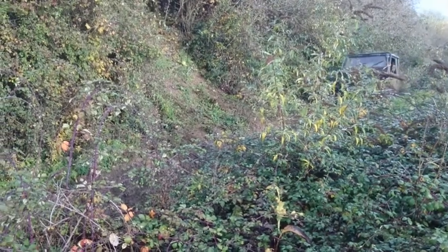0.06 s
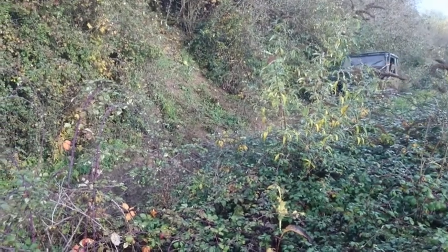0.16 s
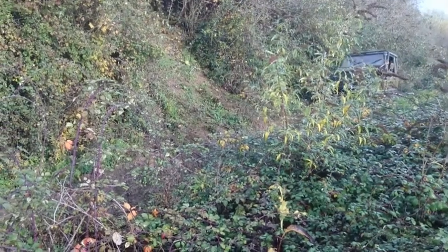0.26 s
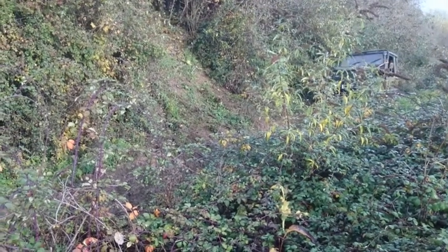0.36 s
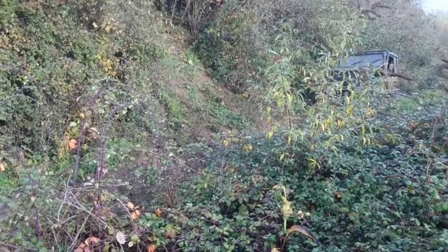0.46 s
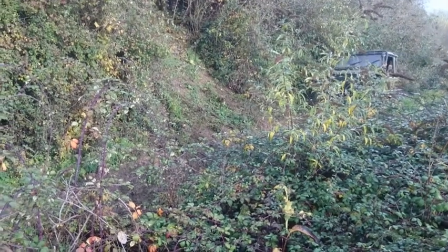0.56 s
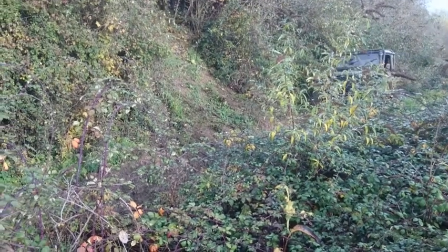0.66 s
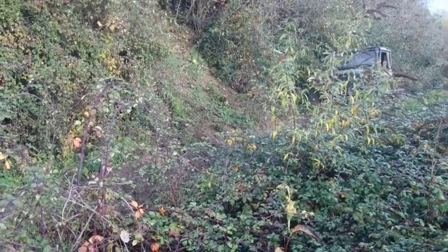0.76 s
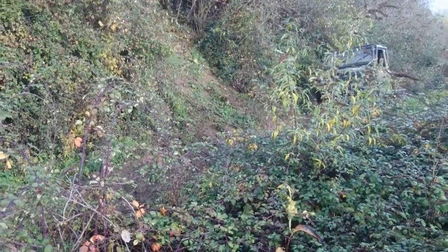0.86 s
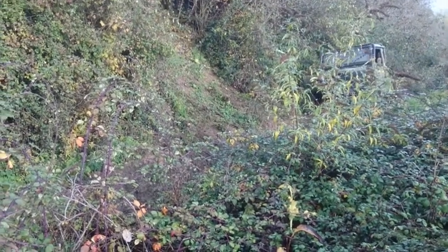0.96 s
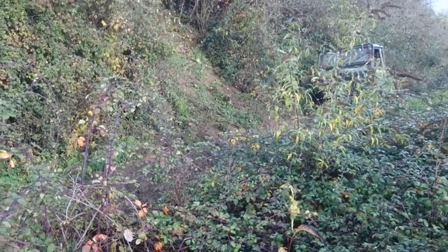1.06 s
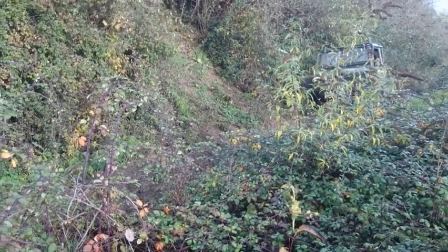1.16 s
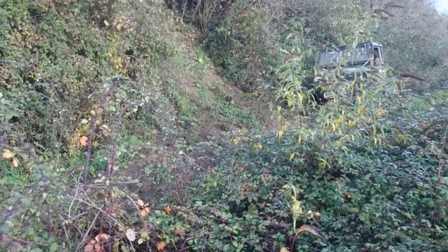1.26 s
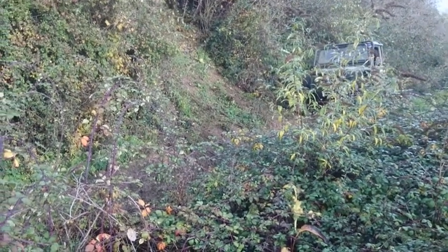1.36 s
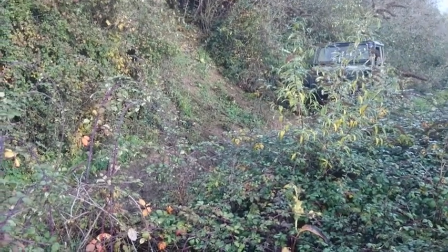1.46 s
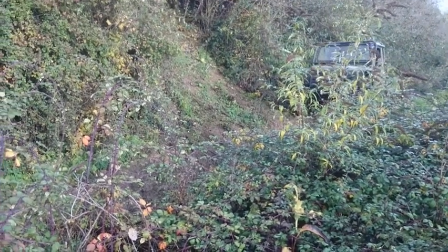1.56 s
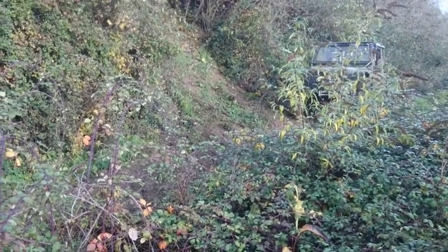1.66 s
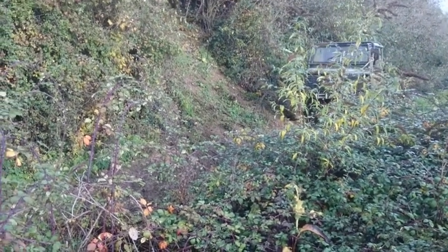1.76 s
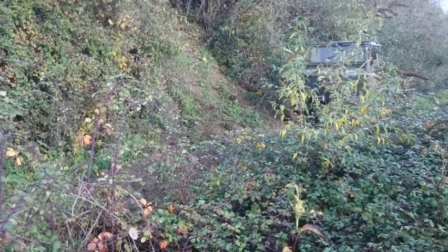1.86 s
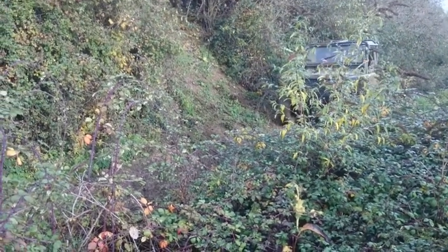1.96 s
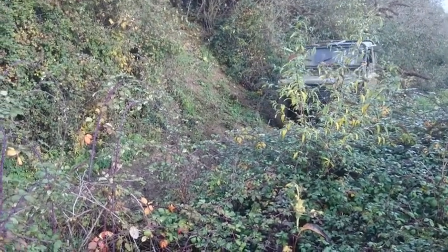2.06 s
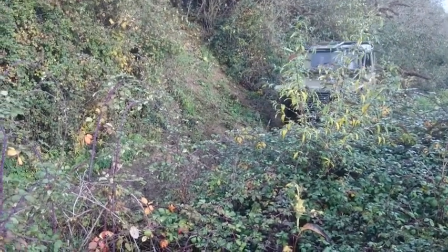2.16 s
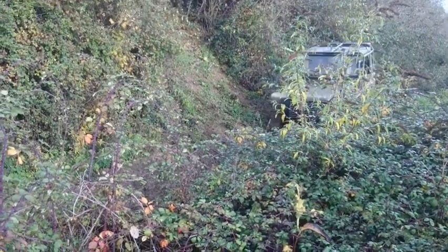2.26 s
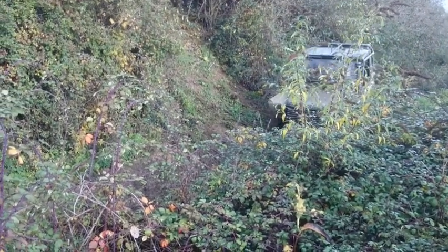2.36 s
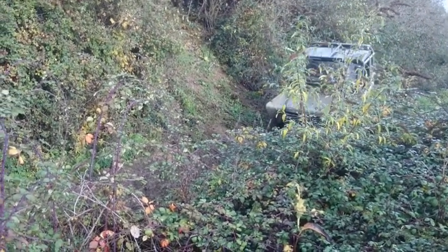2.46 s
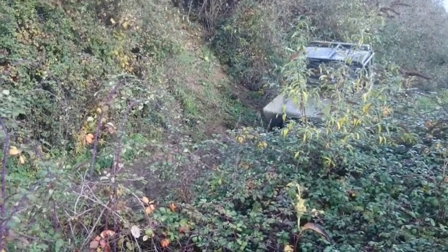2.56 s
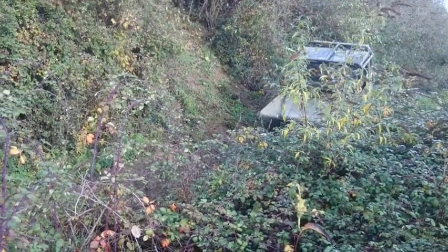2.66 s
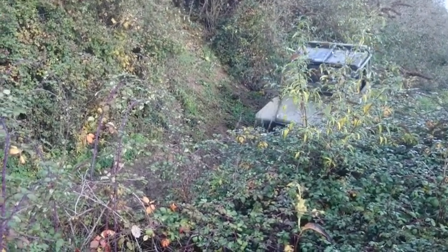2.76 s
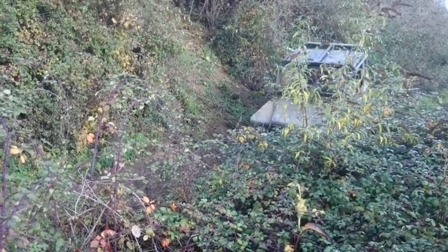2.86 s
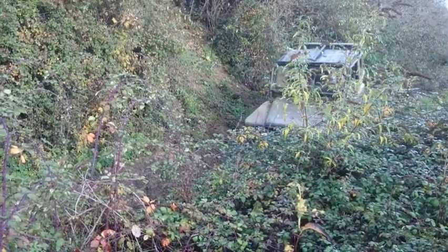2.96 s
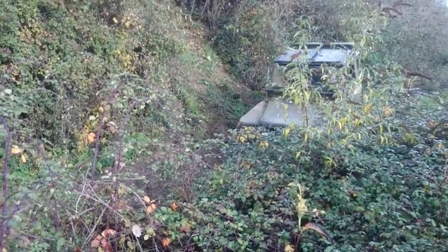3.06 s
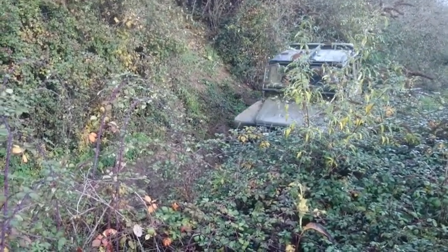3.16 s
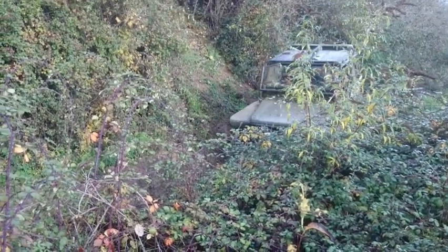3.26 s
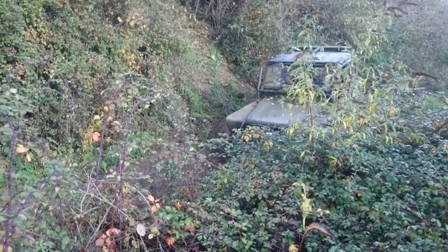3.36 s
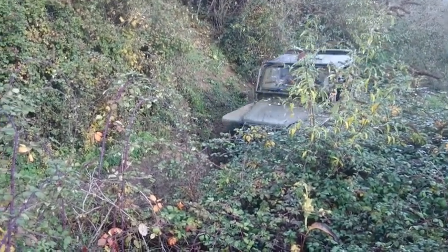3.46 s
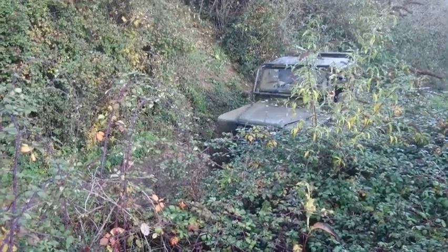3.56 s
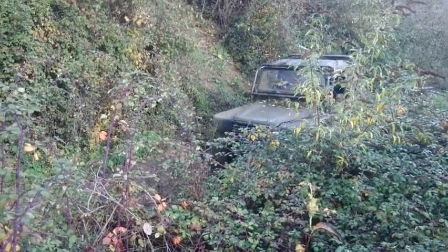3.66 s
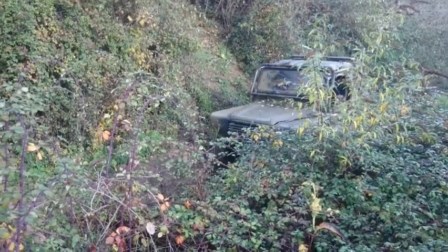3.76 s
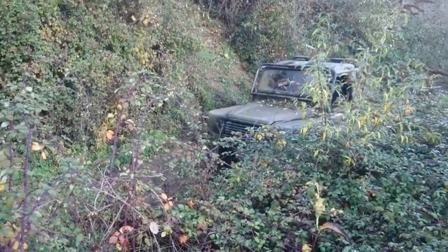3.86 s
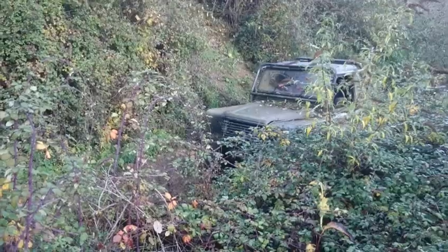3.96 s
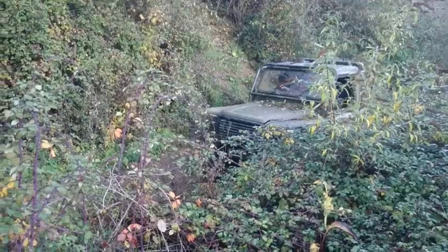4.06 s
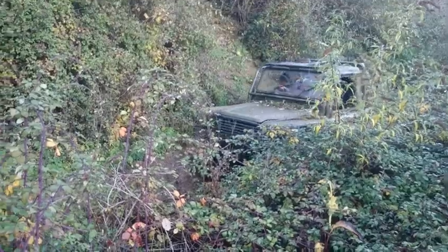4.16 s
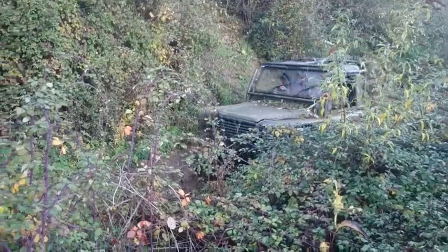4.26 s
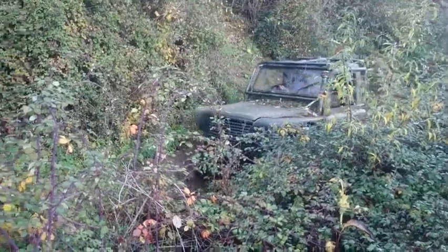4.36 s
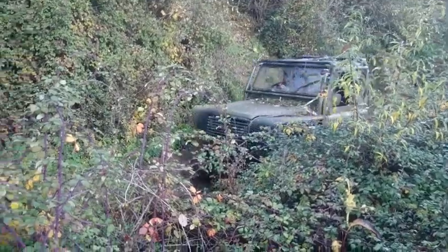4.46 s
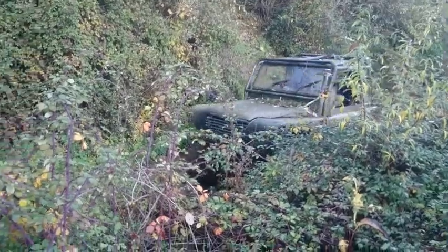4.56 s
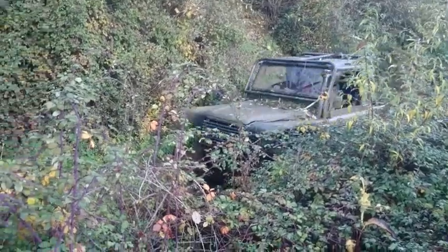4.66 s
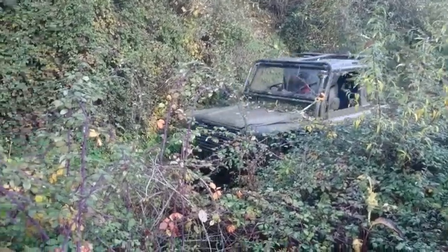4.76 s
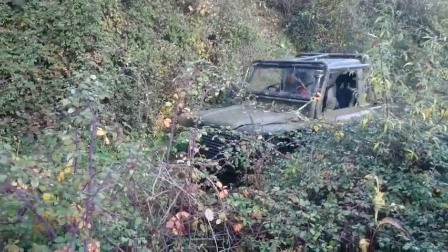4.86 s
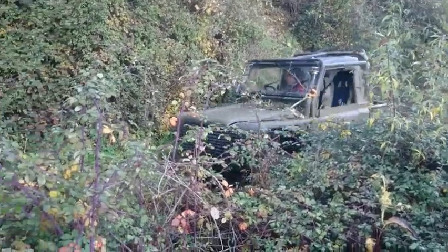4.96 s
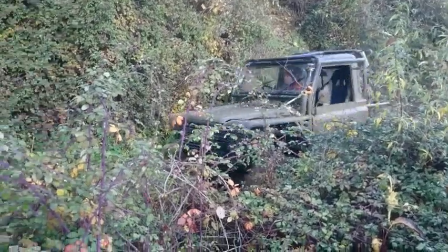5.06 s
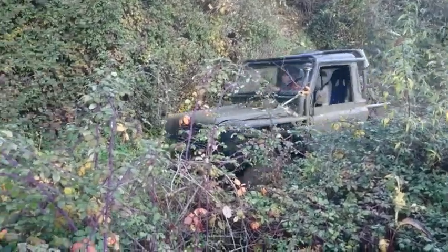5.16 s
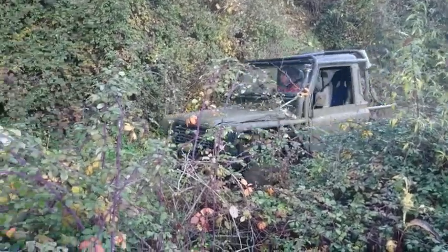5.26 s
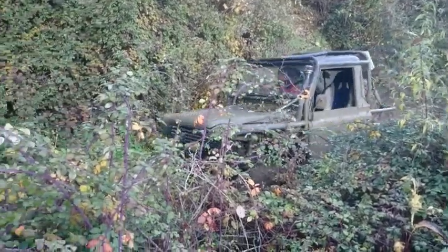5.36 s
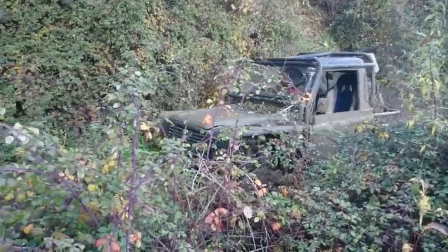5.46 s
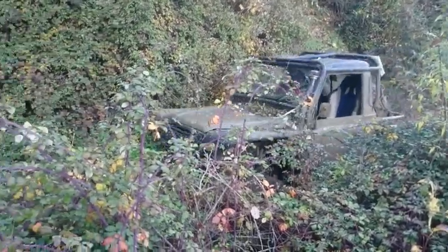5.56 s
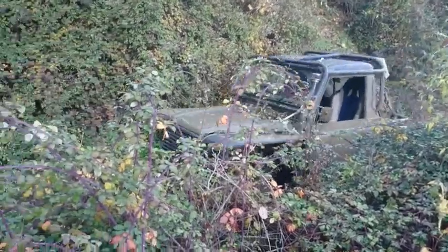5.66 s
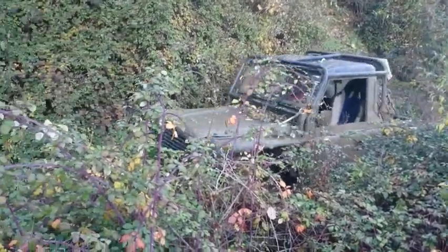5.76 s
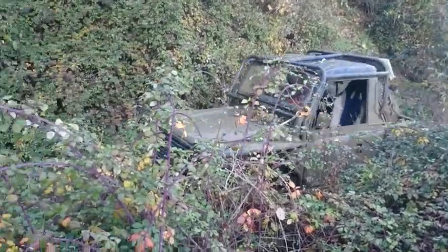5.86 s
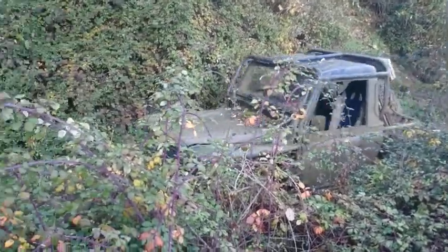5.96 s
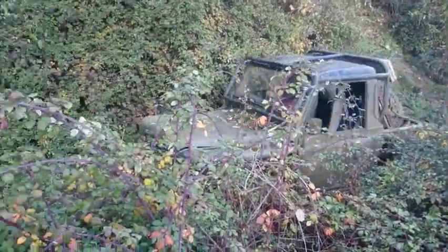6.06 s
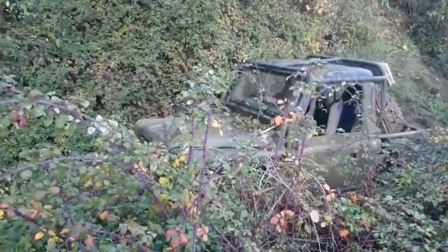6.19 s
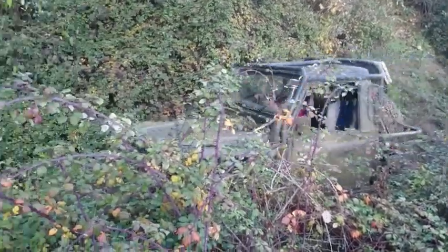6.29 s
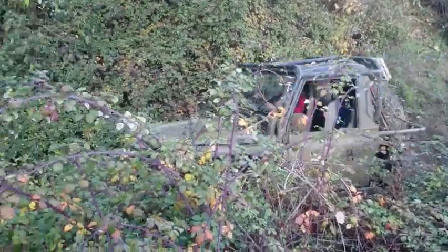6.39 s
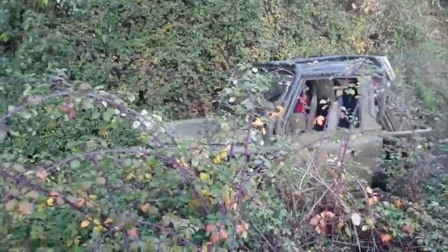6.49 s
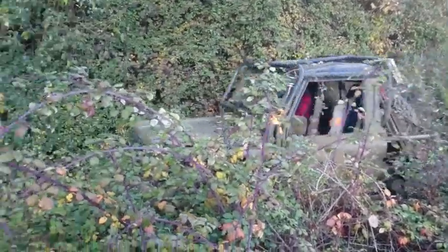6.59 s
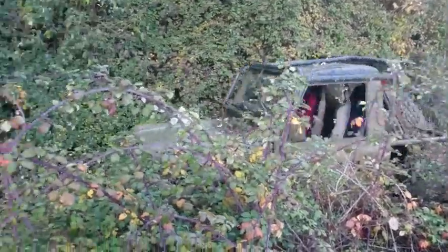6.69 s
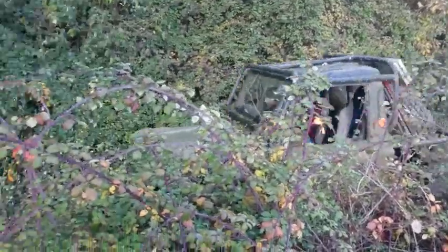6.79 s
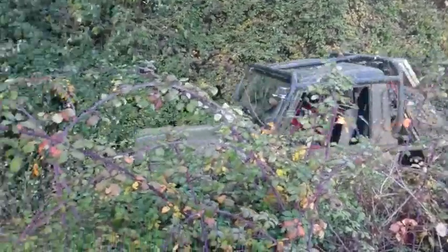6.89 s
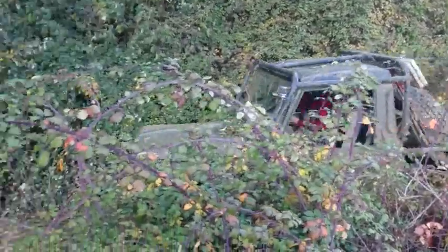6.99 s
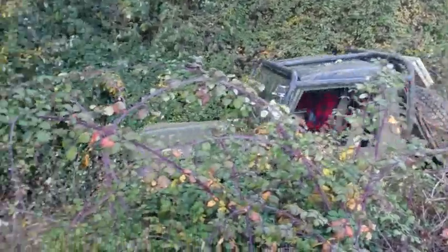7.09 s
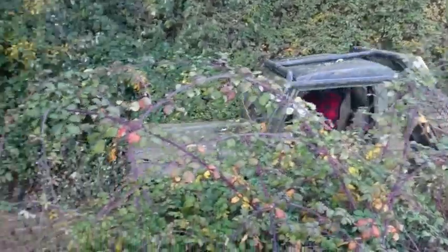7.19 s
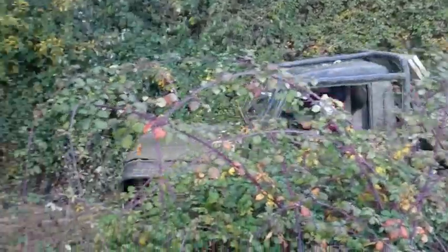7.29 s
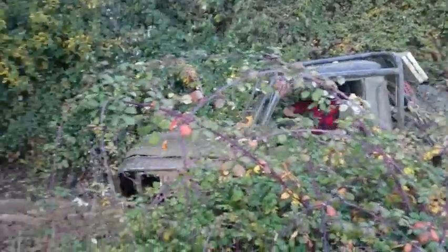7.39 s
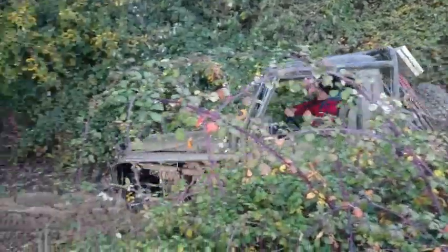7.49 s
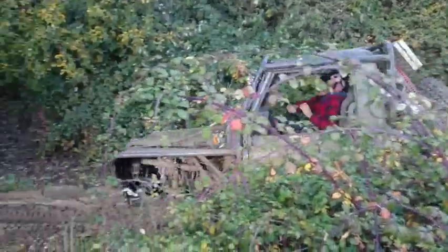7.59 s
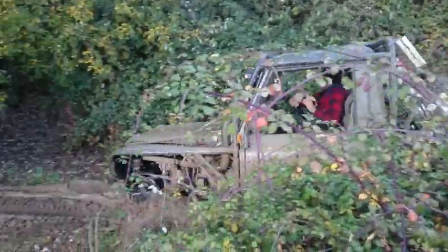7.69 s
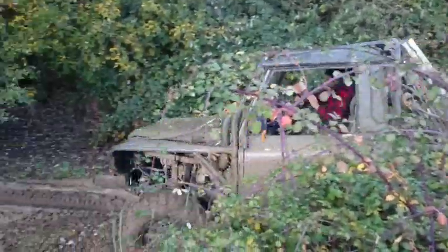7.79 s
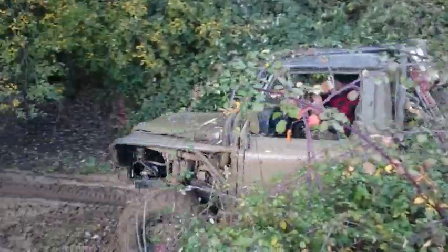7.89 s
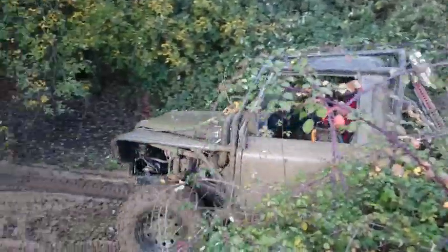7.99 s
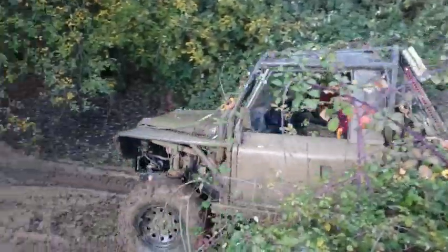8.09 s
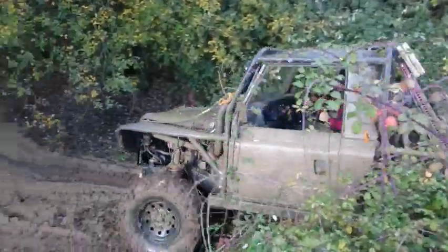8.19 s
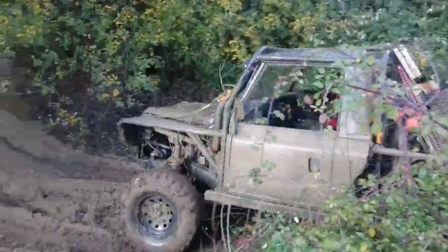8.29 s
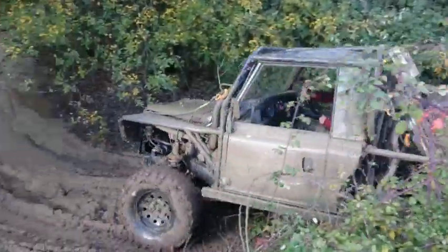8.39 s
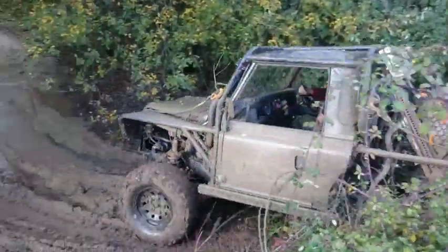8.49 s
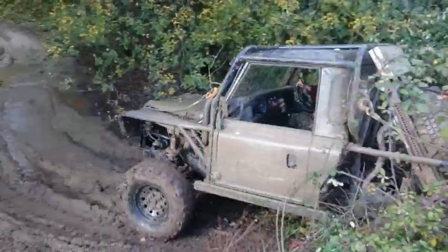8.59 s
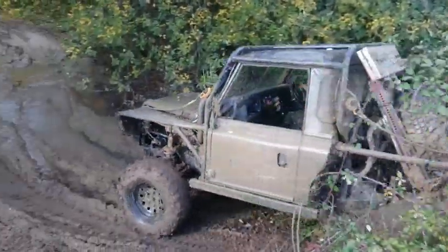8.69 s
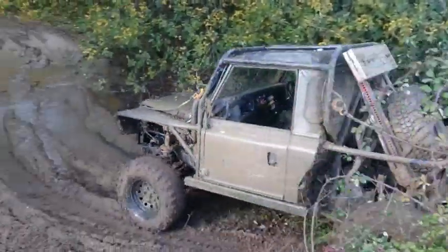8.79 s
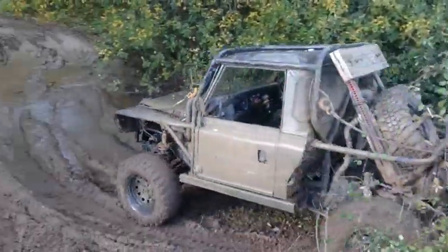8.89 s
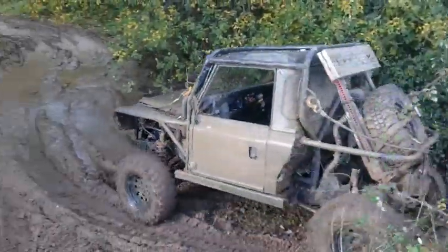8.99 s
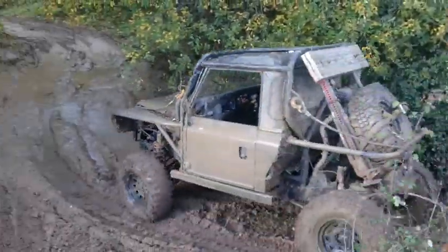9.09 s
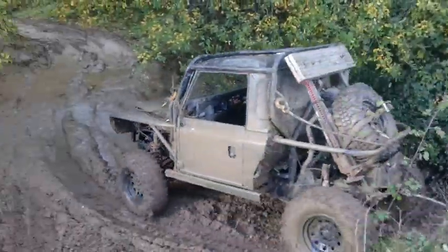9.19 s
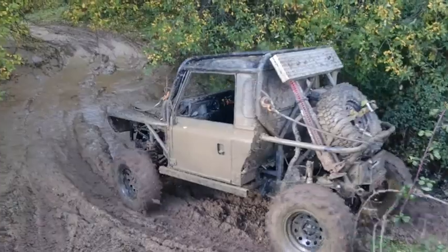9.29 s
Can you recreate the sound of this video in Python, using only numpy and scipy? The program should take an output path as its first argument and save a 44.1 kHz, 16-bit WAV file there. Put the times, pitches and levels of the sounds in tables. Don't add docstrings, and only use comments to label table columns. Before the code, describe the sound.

Muffled, distant diesel throb with faint leaf hiss grows into a close, rattling engine clatter. The revs sag after two seconds, lug slowly, then climb towards the end. Brief bright squeaks pierce it, strongest around six and a half seconds. Wood snaps scatter through the middle, followed by a loud crack and hollow panel knocks at eight. Open air, slight slope echo, small camera microphone nearby as the truck comes past.

```python
import sys
import numpy as np
from scipy import signal
from scipy.fft import rfft, irfft, next_fast_len
from scipy.io import wavfile
from scipy.ndimage import uniform_filter1d

SR = 44100
rng = np.random.default_rng(int(sys.argv[2]) if len(sys.argv) > 2 else 0)


def gain_from_db(level_db):
    decades = np.asarray(level_db, float) / 20
    return 10 ** decades


def wav_record(signal):
    frames = np.transpose(np.atleast_2d(signal))
    bounded = np.clip(frames, -1, 1)
    quanta = np.round(bounded * 32767).astype(np.int16)
    wavfile.write(sys.argv[1], SR, quanta)


N = 411894
T = np.arange(N) / SR
FAST = next_fast_len(N)
HZ = np.maximum(np.fft.rfftfreq(FAST, 1 / SR), 1)
LEVEL_REF_DB = -42


def unit(x):
    return x / np.sqrt(np.mean(x ** 2))


def on_log(table, column=1):
    columns = np.array(table)
    return np.interp(np.log(HZ), np.log(columns[:, 0]), columns[:, column])


def colour(x, table):
    return unit(irfft(rfft(x, FAST) * gain_from_db(on_log(table)), FAST)[..., :N])


def ring(x, hz, width_hz):
    return signal.lfilter(*signal.iirpeak(hz, hz / width_hz, fs=SR), x)


def curves(table):
    s, *columns = np.transpose(table)
    return [np.interp(T, s, column) for column in columns]


def walk(rate, count=1):
    hold = int(SR / rate)
    steps = np.repeat(rng.standard_normal((count, N // hold + 1)), hold, axis=1)
    return 1.356 * uniform_filter1d(uniform_filter1d(steps, hold), hold)[:, :N]


def noise():
    return rng.standard_normal((2, N))


def gate(start, end, fade_s):
    edge_s = np.minimum(T - start, end + 0.019 - T)
    return np.sin(np.pi / 2 * np.clip(edge_s / fade_s, 0, 1)) ** 2


# (time [s], exhaust level [dB], block level [dB], knock depth
EFFORT = [(0, -45.5, -43.5, 0.07), (.99, -45, -39.5, 0.28), (1.5, -40, -40, 0.04), (1.85, -54, -43, 0.27),
          (2.15, -62, -44, 0.13), (2.5, -57, -41, 0.32), (2.92, -64, -44.5, 0.24), (3.25, -54, -43, 0.19),
          (4.05, -47.5, -37.5, 0.33), (4.7, -44, -39, 0.2), (5.3, -39, -35, 0.32), (5.9, -38, -38, 0.23),
          (6.3, -37, -35, 0.1), (6.8, -34.5, -31, 0), (7.57, -39, -29, 0.45), (8.43, -35, -29.5, 0.13),
          (9.0, -35.5, -29, 0.21), (9.34, -33, -25, 0.28)]


def effort():
    return curves(EFFORT)


# (time [s], firing rate [1/s])
FIRING_RATE = [(0, 48), (.6, 52.3), (.8, 46), (1.14, 50.9), (1.62, 44.3), (2.15, 32.8), (2.55, 38),
               (2.98, 34.2), (4.1, 37.8), (4.76, 32.7), (5.2, 37.2), (5.62, 32), (6.16, 34), (6.45, 40),
               (6.65, 38.3), (7.3, 44.3), (8.9, 48.2), (9.34, 53.3)]


def speed():
    return uniform_filter1d(curves(FIRING_RATE)[0], size=6000, mode="nearest")


# (time [s], delay [ms], share [0-1])
MUD_BOUNCE = [(0, 3.4, 0), (2, 2.55, 0), (4, 1.91, 0.18), (5.5, 2.13, 0.06), (6.5, 1.65, 0.27),
              (7.5, 1.43, 0.33), (8.3, 1.42, 0), (9.34, 2.17, 0.23)]


def over_ground(x):
    later_ms, share = curves(MUD_BOUNCE)
    bounce = np.array([np.interp(T - later_ms / 1000, T, path) for path in x])
    return x + share * bounce


# (time [s], level [dB])
BRUSH_RUB = [(0.0, -55), (0.49, -51), (0.72, -56), (1.43, -54.5), (1.95, -59.5), (2.39, -57), (2.57, -50.5),
             (2.78, -59.5), (3.09, -61.5), (3.82, -55.5), (4.84, -51.5), (5.02, -47.5), (6.01, -51),
             (7.08, -45.5), (7.52, -45), (7.91, -41.5), (8.79, -41), (9.34, -37)]
# (frequency [Hz], level [dB per Hz])
LEAF_COLOUR = [(1760, -48.5), (3000, -4), (4000, -9.5), (4350, -7.5), (5070, -9), (6480, -6.5),
               (11200, -12.5), (14700, -21), (16000, -20)]
# (start [s], end [s], level [dB], fade [s])
CANE_SCRAPE = (1, 3.5, -55, 2.3)


def leaves():
    hiss_db = curves(BRUSH_RUB)[0]
    ticks = (rng.random(N) < 120 / SR) * gain_from_db(3.0 * rng.exponential(size=N))
    hiss = noise() * (1 + 0.26 * signal.lfilter([1], [1, -0.98], ticks))

    whistle = unit(ring(ring(noise(), 8510, 850), 8420, 1000))
    block_db = effort()[1]
    whistle_db = -23 + LEVEL_REF_DB + 0.45 * (block_db - LEVEL_REF_DB) - hiss_db
    whistle_db = whistle_db + 6 * gate(-1, 1.9, 0.88)

    start, end, scrape_db, fade_s = CANE_SCRAPE
    cane = unit(ring(ring(noise(), 4300, 500), 4000, 500))
    scrape = gain_from_db(scrape_db) * gate(start, end, fade_s) * cane
    rub = gain_from_db(hiss_db + 2.0 + 1.3 * walk(9.2))
    return scrape + rub * (colour(hiss, LEAF_COLOUR) + gain_from_db(whistle_db) * whistle)


# (time [s], tick level [dB], branch level [dB], thump level [dB], decay t60 [s])
BREAKS = [(1.9987, -17.5, -74.5, -60, 0.016), (3.397, -21.5, -26, -51.5, 0.032),
          (3.099, -56, -37, -60.5, 0.0288), (3.902, -54.5, -28.5, -31.5, 0.017),
          (3.975, -47, -42, -45, 0.039), (4.359, -54, -26.5, -51.5, 0.035), (5.491, -20, -10.5, -26, 0.062),
          (6.610, -33.5, -40.5, -50.5, 0.017), (7.298, -38, -40, -50, 0.036), (7.381, -50, -29, -44, 0.04),
          (7.954, -28, -19.5, -41, 0.094), (7.963, -31, -14, -18, 0.2), (9.333, -14.5, -19, -39, 0.048)]
# (frequency [Hz], level [dB per Hz])
TWIG_COLOUR = [(2500, -22), (4200, -20), (5500, -16), (7700, -3), (10000, -9.5), (13000, -30),
               (16000, -25.5)]
# (frequency [Hz], level [dB per Hz])
BRANCH_COLOUR = [(470, -75), (800, 1), (1190, -1.5), (1540, 1), (1910, 2.5), (3060, -6), (3920, -9.5),
                 (4410, -18), (7000, -22.5), (9100, -51), (15400, -120)]
# (frequency [Hz], width [Hz], level [dB])
WOOD_RING = [(550, 240, -3), (1100, 70, -14.5), (1817.5, 105, -0.5), (2300, 140, -11), (3060, 270, -10.5)]
# (time [s], level [dB], frequency [Hz], decay t60 [s])
PANEL_THUDS = [(2.29, -32, 940, 0.04), (2.315, -33, 760, 0.05), (5.497, -23.5, 243, 0.244),
               (5.51, -21, 186, 0.25), (5.53, -24, 113, 0.3), (5.50, -20.5, 464, 0.27),
               (7.974, -24, 180, 0.174), (7.994, -0.5, 330.3, 0.031), (8.047, -2.5, 271, 0.057),
               (8.068, -11, 250, 0.07), (8.087, -32, 198.9, 0.071)]


def cracks():
    bursts = np.zeros((3, N))
    for s, *layer_db, t60 in BREAKS:
        tail_db = -2.5 + 0.59 * layer_db[1]
        a = int(s * SR)
        t = T[:min(SR // 2, N - a)]
        decay = gain_from_db(-60 * t / t60) + gain_from_db(tail_db - 60 * t / 0.37)
        level = gain_from_db(np.array(layer_db) - 3.5)[:, None]
        bursts[:, a:a + len(t)] += np.minimum(t / 0.0032, 1) * decay * level
    tick, branch, bump = bursts

    splinter = gain_from_db(2.0 * walk(250)[0])
    snap = splinter * (tick * colour(noise(), TWIG_COLOUR) + branch * colour(noise(), BRANCH_COLOUR))
    shake = branch * noise()
    for hz, width_hz, db in WOOD_RING:
        even_out = np.sqrt(SR / (np.pi * width_hz))
        snap = snap + gain_from_db(db) * even_out * ring(shake, hz, width_hz)
    thump = gain_from_db(7.5) * ring(bump * unit(ring(noise(), 410, 210)), 330, 400)

    thuds = np.zeros(N)
    for s, db, hz, t60 in PANEL_THUDS:
        a, t = int(s * SR), T[:SR // 4]
        shape = gain_from_db(db - 60 * t / t60) * np.minimum(t / 0.006, 1)
        thuds[a:a + len(t)] += shape * np.sin(2 * np.pi * hz * t)
    return snap + thump + thuds


# (time [s], peak level [dB], pitch [Hz], octave level [dB], length [s])
JOINT_SLIPS = [
    (0.397, -51, 6310, 2, 0.047),
    (1.5204, -38, 5940, -9, 0.06),
    (2.122, -40, 5720, -16, 0.055),
    (3.783, -34, 6160, -10, 0.042),
    (4.597, -35.5, 6160, -17, 0.039),
    (5.588, -27.5, 5874, -7.5, 0.054),
    (6.056, -34, 5670, -4, 0.057),
    (6.605, -23, 5951, -5.5, 0.0419),
    (7.03, -26, 5924, -5, 0.0633),
    (7.713, -26, 6180, -12, 0.037),
]
# (time [s], peak level [dB], pitch [Hz], octave level [dB], length [s])
PAIRED_SLIPS = [
    (6.622, -22, 6380, -16.5, 0.04),
    (4.607, -33, 5760, -9, 0.029),
]


def squeaks():
    out = np.zeros((2, N))
    smear = walk(350, count=2) + 1j * walk(350, count=2)
    octave_smear = walk(600, count=2) + 1j * walk(600, count=2)
    for s, db, hz, octave_db, length in JOINT_SLIPS + PAIRED_SLIPS:
        a, b = int(s * SR), int((s + 0.3) * SR)
        t = T[a:b] - T[a]
        turn = 2j * np.pi * np.cumsum(hz * (1 - 0.05258 * t)) / SR
        decay = np.exp(-(t / length) ** 2) + 0.208 * np.exp(-t / 0.061)
        shape = np.minimum(t / 0.0044, 1) * decay * gain_from_db(db - 9.0)
        tone = (0.89 + 0.62 * smear[:, a:b]) * np.exp(turn)
        octave = (0.57 + 0.58 * octave_smear[:, a:b]) * np.exp(2 * turn)
        out[:, a:b] += shape * np.imag(tone + gain_from_db(octave_db + 5.5) * octave)
    return out


# (start [s], end [s], multiple of the fan rate, level against the block [dB])
FAN_WHINES = [(1.25, 1.75, 5, -20), (1.66, 1.84, 7, -10), (1.9, 2.3, 8, -15), (2.28, 2.92, 8, -9),
              (2.4, 2.65, 7, -17), (3.3, 4.75, 8, -16), (3.3, 4.4, 7, -17), (4.7, 6.3, 8, -11),
              (6.33, 7.05, 7, -17), (7.0, 7.35, 5, -18), (6.85, 7.85, 4, -17), (8.0, 9.34, 5, -19),
              (8.15, 8.7, 4, -19)]


def fan():
    waver, swell = walk(30)[0], walk(11)[0]
    fan_order = 3.44
    turn = 2 * np.pi * np.cumsum(fan_order * speed() * (1 + 0.00909 * waver)) / SR
    tones = np.zeros(N)
    for start, end, multiple, db in FAN_WHINES:
        tones += gate(start, end, 0.027) * gain_from_db(db) * np.sin(round(multiple) * turn)
    block_db = effort()[1]
    return tones * gain_from_db(block_db + 5.0 + 2.4 * swell)


ORDER_PUSH = [0, 0, 1, -1, -1, -9]
# (frequency [Hz], level [dB])
PIPE_RESPONSE = [(36, -33), (52, -1.5), (75, 2.5), (98, -8), (115, -10.5), (143, -3.5), (195, -17),
                 (260, -12.5)]
# (frequency [Hz], level [dB per Hz])
THROB_COLOUR = [(18, -38.5), (30, -8), (58, -4.5), (81, 3), (146, -4.5), (294, -1.5), (412, -12.5),
                (600, -9), (780, -18.5), (1320, -120)]
# (frequency [Hz], level [dB per Hz])
KNOCK_COLOUR = [(590, -9), (1000, -1), (1340, 1.5), (1460, 3), (2000, 2), (2570, -3), (2930, -10),
                (3870, -38), (4500, -73.5), (5850, -51.5), (9900, -120)]
# (frequency [Hz], width [Hz], level [dB])
BLOCK_RING = [(1270, 50, -12), (1579.6, 49.6, -16), (1807.4, 45, -9), (2129.5, 70, -16), (2259.6, 75, -12),
              (2617, 44.4, -20), (3062.5, 50, -22)]


def engine():
    hz = speed()
    exhaust_db, block_db, depth = effort()
    turns = np.cumsum(hz * (1 + 0.00647 * walk(12)[0])) / SR
    cycle, phase = turns.astype(int), turns % 1
    cylinder_db = np.array([0, -1.5, 0.5, -2.5])[cycle % 4]
    size = gain_from_db(cylinder_db + 1.2 * rng.standard_normal(N // 500)[cycle])

    pipe_hz, pipe_db = np.transpose(PIPE_RESPONSE)
    tail_open_db = np.interp(T, (8.63, 8.85), [0, 12])
    hum = np.zeros(N)
    for k, push_db in enumerate(ORDER_PUSH):
        order_hz = (k + 1) * hz
        order_db = exhaust_db + push_db + np.interp(np.log(order_hz), np.log(pipe_hz), pipe_db)
        order_db = order_db + 1.5 * walk(4)[0] + 0.83 * walk(7.8)[0]
        order_db = order_db + tail_open_db * (order_hz > 170)
        hum += gain_from_db(order_db) * np.sqrt(2) * np.sin(2 * np.pi * (k + 1) * turns + k)

    firing = np.diff(cycle, prepend=0) * size
    upper = unit(ring(ring(firing, 323, 240), 235, 270))
    puff = size * np.minimum(phase / 0.43, 1) * np.exp(-phase / 0.5)
    gas = colour(noise() * (1.3 + 0.32 * puff), THROB_COLOUR)
    throb = gain_from_db(-7.0) * upper + gain_from_db(2.0) * gas
    throb_db = -4.5 + 0.1 * exhaust_db + 0.9 * block_db
    intake = unit(ring(ring(noise() * (2.1 + 0.2 * puff), 980, 840), 930, 1000))

    depth = np.clip(depth + 0.12, 0.35, 1)
    blow = 1.4 * size * np.minimum(phase / 0.06, 1) * np.exp(-phase / 0.24)
    bang = noise() * (1 - depth + 1.2 * depth * blow)
    strike = noise() * (0.2 + 4 * size * np.minimum(phase / 0.1, 1) * np.exp(-phase / 0.16))
    clatter = unit(ring(ring(bang, 3370, 1130), 3440, 1400))
    clatter_db = -15 + LEVEL_REF_DB + 0.71 * (block_db - LEVEL_REF_DB)
    knock = colour(bang, KNOCK_COLOUR)
    for ring_hz, width_hz, db in BLOCK_RING:
        wide = 2.7 * width_hz
        knock = knock + gain_from_db(db + 2.0 * walk(2.54)) * unit(ring(ring(strike, ring_hz, wide), ring_hz, wide))
    knock_db = block_db + 1.5 + 0.5057 * walk(13)

    low = gain_from_db(5.0) * hum + gain_from_db(throb_db) * throb
    rattle = gain_from_db(clatter_db) * clatter + gain_from_db(block_db - 8.0) * intake
    return low + rattle + gain_from_db(knock_db) * unit(over_ground(knock))


def scene():
    return leaves() + cracks() + squeaks() + fan() + engine()


def roll_off(x):
    return signal.sosfilt(signal.butter(12, 16550, fs=SR, output="sos"), x)


# (frequency [Hz], level [dB], common share [0-1], phase lead [rad])
LEFT_PORT = [(51, -1, 1, 2.37), (152, -7.5, 1, 2.59), (250, -9, 0.88, 3.47), (497, -10.5, 1, 2.66),
             (1100, -11, 1, 2.81), (2040, -12, 0.33, 1.9), (3015, -12.5, 0.61, 2.88), (3990, -4, 0, 2),
             (6500, 0, 0.22, 2.3), (9150, 5.5, 0, 11.3), (11700, -8, 0.03, 1.8), (14000, -17.5, 0, 3.8)]
# (time [s], left port earlier [ms])
LEFT_LEAD = [(0, 0), (3.5, 0.13), (6, 0.23), (9.34, 0.25)]


def record(dry):
    early = np.interp(T + curves(LEFT_LEAD)[0] / 1000, T, dry[0])
    near, early, other = rfft(np.array([dry[0], early, dry[1]]), FAST)
    tilt = gain_from_db(on_log(LEFT_PORT))
    alike = np.clip(on_log(LEFT_PORT, column=2), 0, 1)
    turned = np.exp(1j * on_log(LEFT_PORT, column=3))
    left = (alike * early + np.sqrt(1 - alike ** 2) * other) * turned
    right_gain = gain_from_db(2.0) * np.sqrt(2 / (1 + tilt ** 2)) * (HZ < 15850)
    ports = irfft(np.array([left * tilt, near]) * right_gain, FAST)[:, :N]
    ports = 1.1 * np.tanh(ports / 1.1)
    return roll_off(ports)


dry = scene()
out = record(dry)
wav_record(out)
```